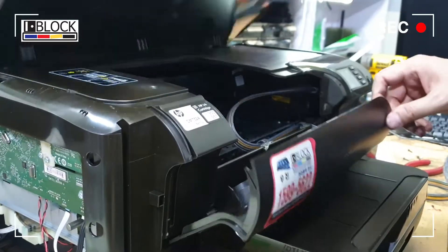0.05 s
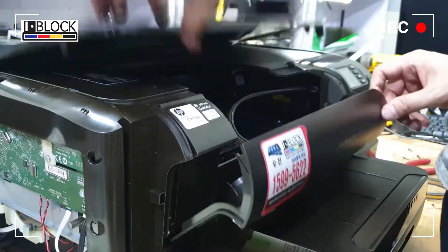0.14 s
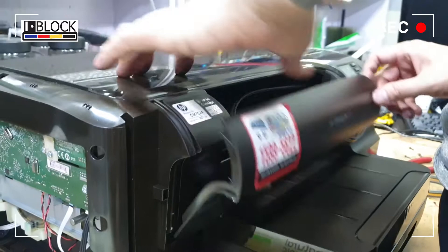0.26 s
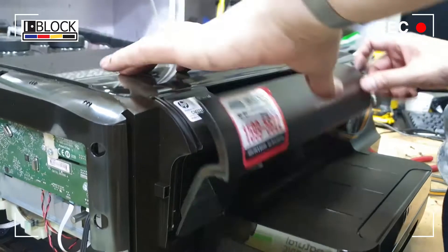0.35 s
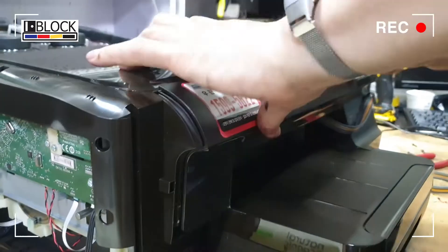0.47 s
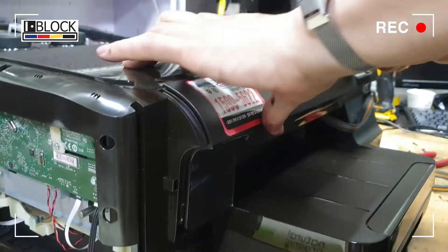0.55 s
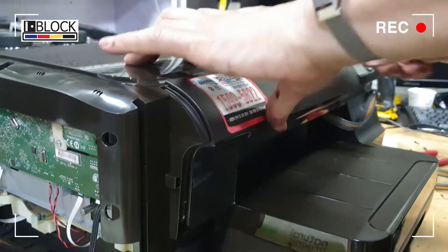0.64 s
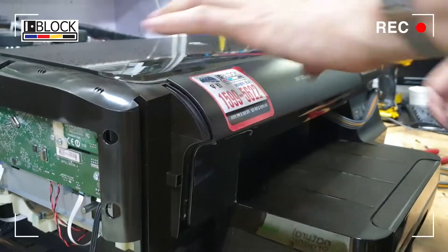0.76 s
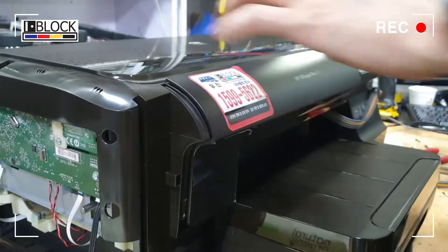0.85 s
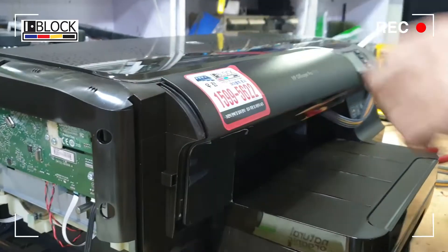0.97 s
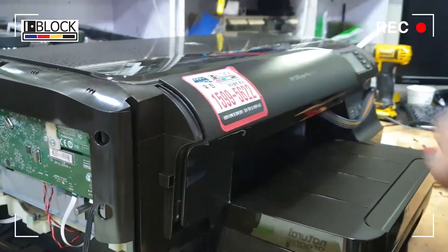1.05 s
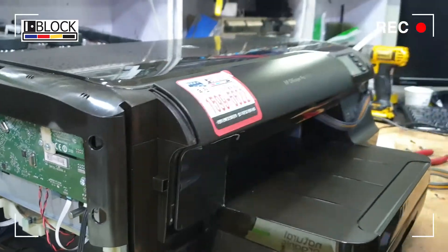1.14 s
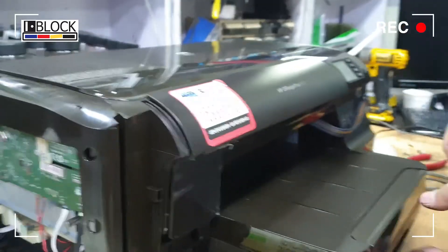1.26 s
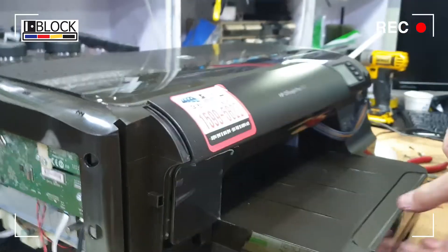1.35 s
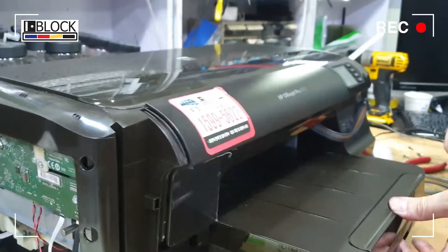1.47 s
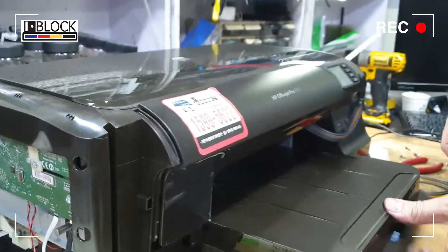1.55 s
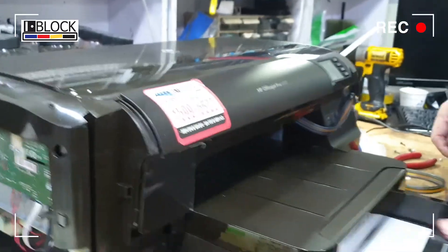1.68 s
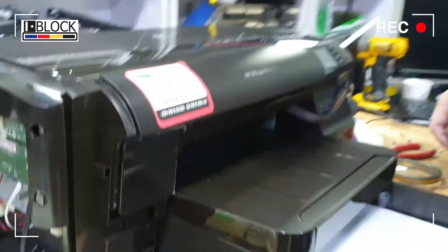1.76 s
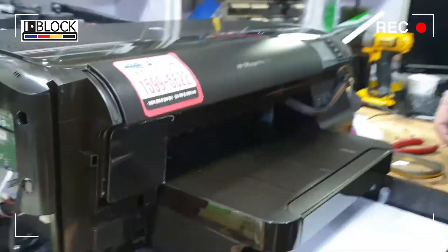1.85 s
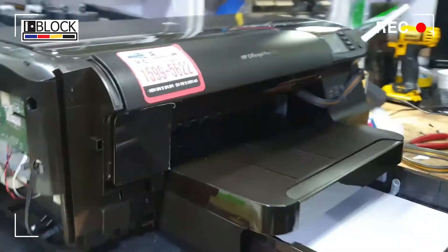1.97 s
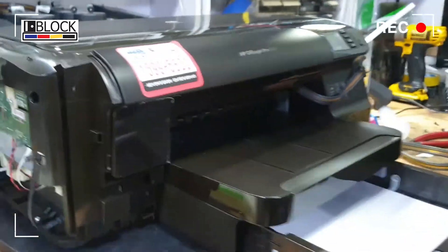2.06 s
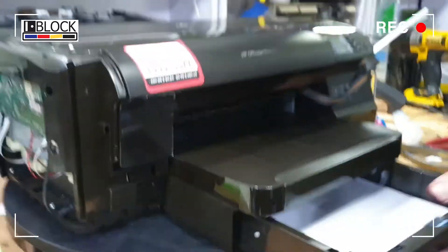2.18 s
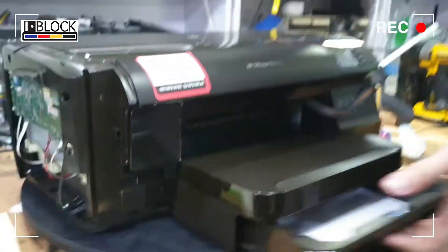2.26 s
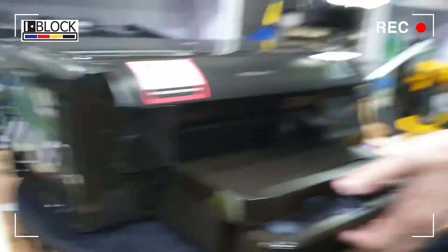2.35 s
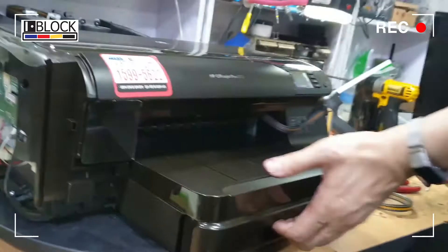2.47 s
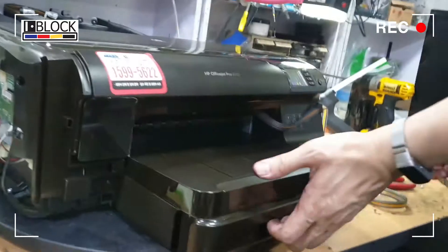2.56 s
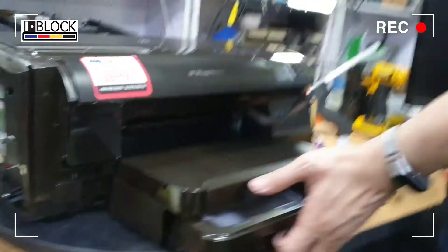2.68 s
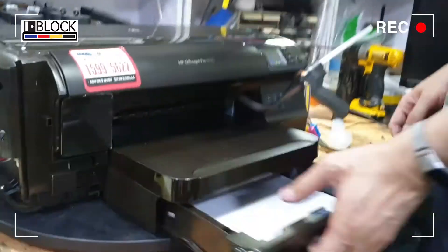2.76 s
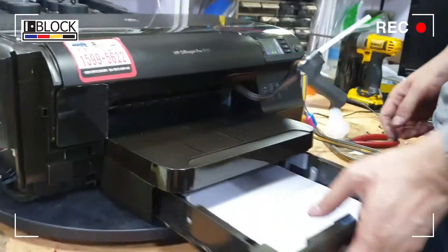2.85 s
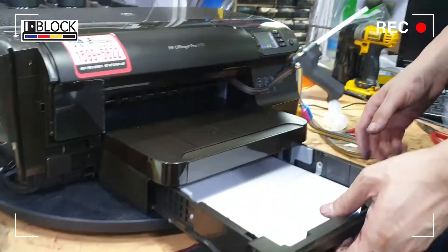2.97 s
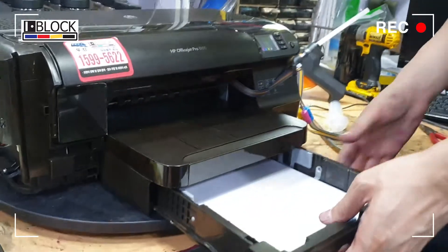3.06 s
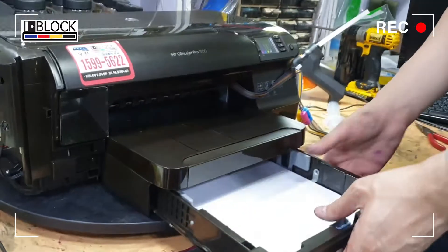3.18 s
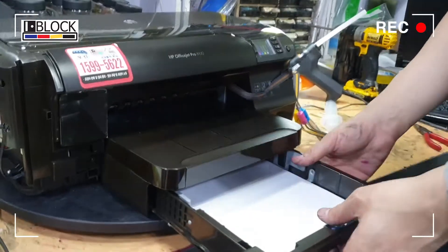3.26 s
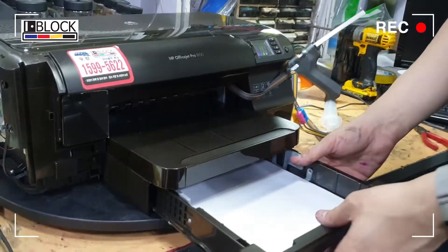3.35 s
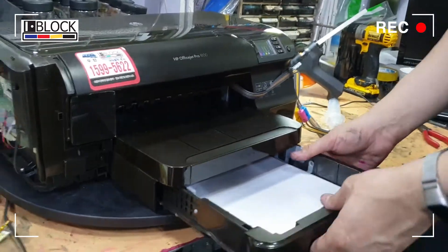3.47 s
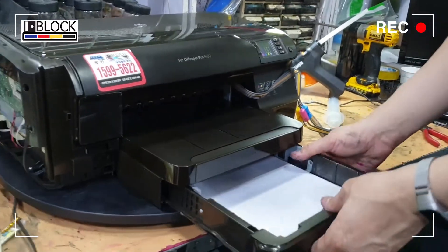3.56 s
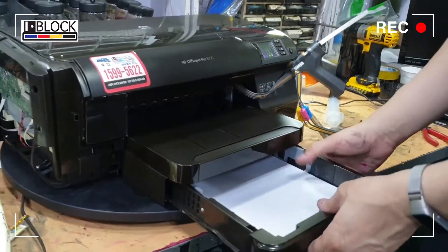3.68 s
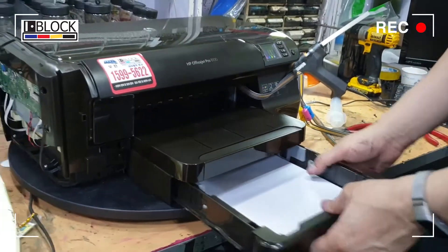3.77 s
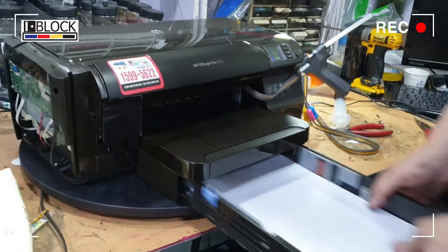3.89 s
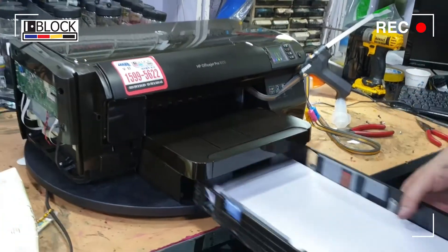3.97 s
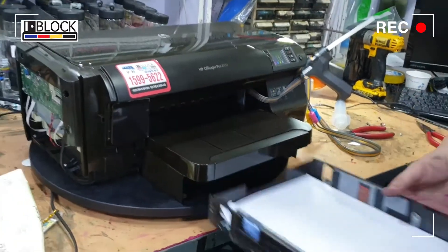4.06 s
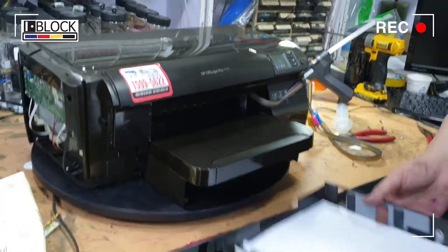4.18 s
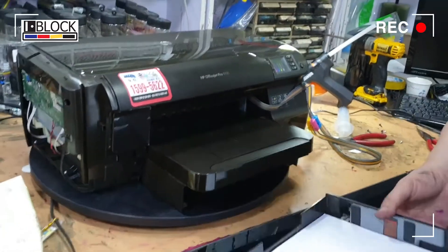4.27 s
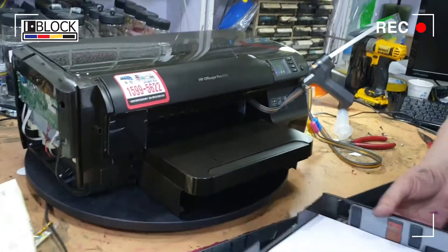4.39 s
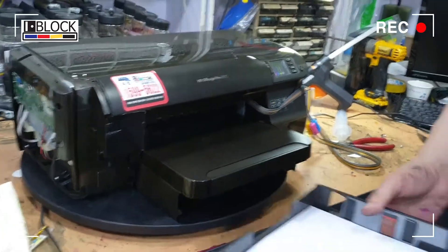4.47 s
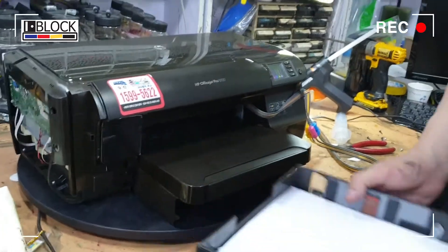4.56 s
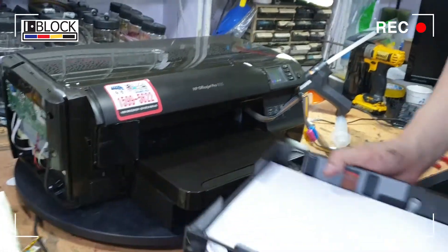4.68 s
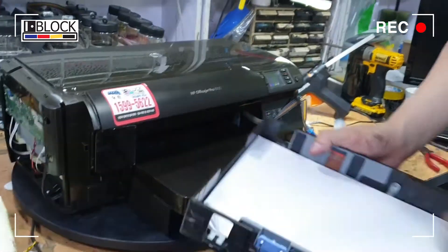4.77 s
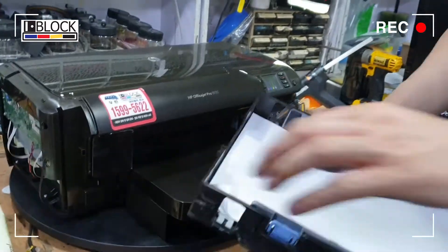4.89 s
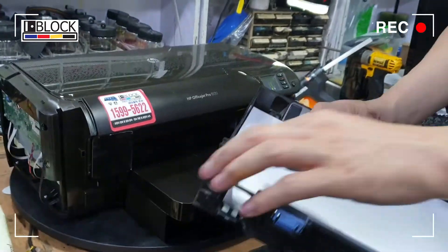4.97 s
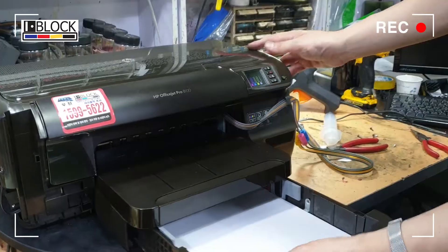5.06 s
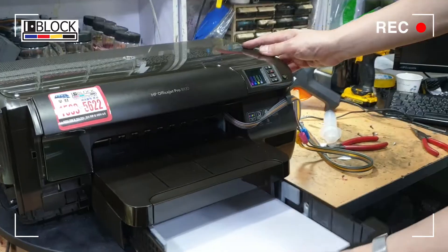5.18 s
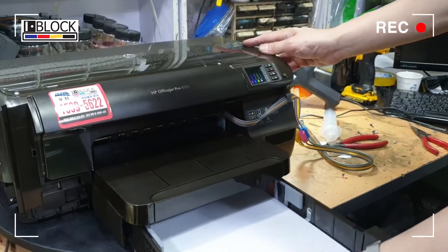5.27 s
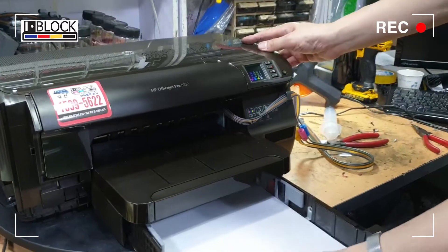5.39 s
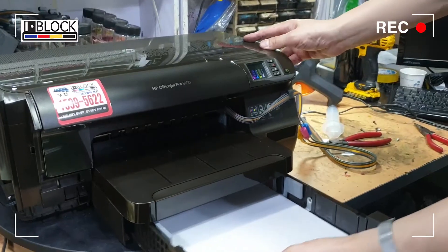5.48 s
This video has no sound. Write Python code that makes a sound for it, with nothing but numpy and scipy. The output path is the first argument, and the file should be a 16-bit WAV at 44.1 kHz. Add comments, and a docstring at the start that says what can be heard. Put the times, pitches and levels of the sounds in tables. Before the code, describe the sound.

Close handheld stereo recording of a plastic printer in a small workshop. A flap snaps in, the lid hinge chirps and the lid drops with a dull thump. Then the tray rattles, scrapes and squeaks along its rails, slams against its stop, clacks again sharply and ends in faint taps over low hum.

```python
"""Small workshop, two microphones on a hand-held camera: a low hum and air under a printer on a bench.
First a flap snaps in and the lid chirps and drops shut close by; then the paper tray is pulled, pushed home
and lifted out. Chattering contacts ring the hollow plastic shell; the tray scrapes and squeaks on its rails.
Noise impulses drive the shell's resonances, sine modes make the lid, and soft bumps reach the camera by touch."""
import sys
import numpy as np
from scipy import signal
from scipy.fft import rfft, irfft
from scipy.io import wavfile
from scipy.ndimage import uniform_filter1d

SR = 44100
rng = np.random.default_rng(int(sys.argv[2]) if len(sys.argv) > 2 else 0)


def master(y):
    """Save y as 16-bit WAV."""
    cut = np.clip(np.atleast_2d(y).T, -1, 1)
    pcm = np.round(cut * 32767)  # scale
    wavfile.write(sys.argv[1], SR, pcm.astype(np.int16))


N = 243873
TIME = np.arange(N) / SR   # s
GRID_HZ = np.maximum(np.fft.rfftfreq(4096, 1 / SR), 1)   # kept above zero for the log axis
CUTOFF_HZ = 16000


def from_db(db):
    """Decibels to gain."""
    return 10 ** (np.asarray(db) / 20)


def rms_one(x):
    """Scale to rms 1."""
    return x / np.sqrt(np.mean(x ** 2) + 1e-20)


def at_hz(points, hz):
    """Read a table on a log-frequency axis."""
    table = np.array(points)
    return np.interp(np.log(hz), np.log(table[:, 0]), table[:, 1])


def gain_curve(rows):
    """Smoothed gain in time from (t/s, level/dB) rows, -120 dB outside them."""
    s, db = np.transpose(rows)
    return uniform_filter1d(from_db(np.interp(TIME, s, db, left=-120, right=-120)), size=400)


def add(track, s, sound):
    """Mix a sound in at time s."""
    i = max(round(s * SR), 0)
    track[..., i:i + sound.shape[-1]] += sound[..., :N - i]


def coloured(x, db):
    """Causal, minimum-phase filter with the given dB on GRID_HZ."""
    cepstrum = irfft(np.log(from_db(db)))
    half = len(cepstrum) // 2
    # folding the cepstrum forward in time gives minimum phase
    cepstrum[1:half] *= 2
    cepstrum[half + 1:] = 0
    response = irfft(np.exp(rfft(cepstrum)))
    return signal.fftconvolve(x, response)[:len(x)]


def band(x, low_hz, high_hz, order=2):
    """Butterworth band-pass."""
    edges = [low_hz, min(high_hz, .49 * SR)]
    return signal.sosfilt(signal.butter(order, edges, "band", fs=SR, output="sos"), x)


def diffuse(count, apart_hz=850, bass_likeness=0.86):
    """White sound from all sides: alike at both microphones in the bass, unrelated in the treble."""
    mid, side = rfft(rng.standard_normal((2, count)))
    alike = min(bass_likeness, 1) / (1 + (np.fft.rfftfreq(count, 1 / SR) / apart_hz) ** 2)
    pair = np.sqrt(1 + alike) * mid + np.sqrt(1 - alike) * side * [[1], [-1]]
    return irfft(pair / np.sqrt(2), count)


# spectrum of the workshop air at the microphones: f/Hz, relative level/dB per Hz
AIR_SPECTRUM = [(20, -0.5), (35, -33), (58, -4), (100, -27.5), (200, -15), (400, -23), (1000, -25.5),
                (2500, -29), (3500, -35.5), (6000, -41.5), (10000, -41), (16000, -61)]
# swell of hum and handling rumble together, before their own offsets: t/s, level/dB
RUMBLE_LEVEL = [(0.0, -41.5), (0.18, -42.5), (0.77, -51), (2.09, -46.5), (4.96, -62), (5.16, -53),
                (5.53, -58)]
AIR_DB, HUM_HZ, HUM_DB = -50, 56.6, 1   # the hum's amplitude is re RUMBLE_LEVEL


def background(waver=0.083, handling_db=-2.5, left_db=-15.0):
    """Steady room air, a low wavering hum, and low-band noise from the hand that holds the camera."""
    air = rms_one(np.array([coloured(side, at_hz(AIR_SPECTRUM, GRID_HZ)) for side in diffuse(N)]))
    swell = 1 + waver * np.interp(TIME, np.linspace(0, TIME[-1], 30), rng.standard_normal(30))
    hum = from_db(HUM_DB) * swell * np.sin(2 * np.pi * HUM_HZ * TIME)
    rumble = rms_one(band(rng.standard_normal(N), 60, 144))
    handling = from_db(handling_db) * rumble * from_db([[left_db], [0]])   # weaker at the left microphone
    return from_db(AIR_DB) * air + gain_curve(RUMBLE_LEVEL) * (hum + handling)


# decay of the small workshop: f/Hz, t60/s
WORKSHOP_DECAY = [(100, 0.25), (300, 0.31), (1000, 0.2), (3000, 0.35), (7000, 0.36), (15000, 0.32)]


def workshop(x, tail_db=-6.0, tail_rise_s=0.0024):
    """The cluttered room stores each band's energy and gives it back as a smooth, diffuse tail."""
    out, washes = x.copy(), [diffuse(N), diffuse(N)]
    edges = np.geomspace(80, 18000, 17)
    build = np.exp(-1 / (tail_rise_s * SR))
    for k, (low, high) in enumerate(zip(edges, edges[1:])):
        t60 = at_hz(WORKSHOP_DECAY, np.sqrt(low * high))
        keep = from_db(-60 / (t60 * SR)) ** 2   # energy left after one sample
        power = band(x[k % 2], low, high) ** 2   # left and right feed alternate bands
        gain, feedback = [(1 - keep) * (1 - build)], np.convolve([1, -keep], [1, -build])
        stored = signal.lfilter(gain, feedback, power + 1e-18)
        wash = rms_one(band(washes[k % 2], low, high))
        out += from_db(tail_db) * np.sqrt(np.abs(stored)) * wash
    return out


# the hand bumps the camera body: centre t/s, peak level/dB before the microphone gains, f/Hz, length/s
CAMERA_BUMPS = [(0.05, -19.5, 109, 0.015), (0.071, -16.5, 73, 0.056), (1.022, -33.5, 60, 0.039),
                (1.948, -33, 76.4, 0.19), (2.004, -19.5, 89, 0.023), (2.197, -22, 86, 0.024),
                (2.218, -18, 61.3, 0.088)]


def bumps(left_db=-42.0, right_db=0.5):
    """The camera body rocks briefly at a low pitch, mostly at the right microphone."""
    out = np.zeros(N)
    for s, db, hz, length in CAMERA_BUMPS:
        t = TIME[:int(length * SR)] - length / 2
        rocking = np.hanning(len(t)) * np.cos(2 * np.pi * hz * t)
        add(out, s - length / 2, -from_db(db) * rocking)
    return out * from_db([[left_db], [right_db]])


def nearby(x, near_db=1.5, near_t60=0.03):
    """Direct sound plus quick reflections off bench and case, drawn anew each call; keeps the rms."""
    t = TIME[:SR // 16]
    reflections = rms_one(diffuse(len(t)) * from_db(-60 * t / near_t60))
    response = from_db(near_db) * reflections / np.sqrt(len(t))
    # the direct path has its own delay of 0-7 samples to each microphone
    response[[0, 1], rng.integers(0, 8, 2)] += 1
    heard = signal.fftconvolve(x[None], response, axes=1)[:, :len(x)]
    return np.std(x) * rms_one(heard)


# short squeaks and chirps of the lid's hinge and the tray's rails:
# t/s, length/s, f/Hz, level of the fundamental/dB, fall per overtone/dB
SQUEAKS = [(0.428, 0.0085, 2010, -20, 18), (2.79, 0.022, 10830, -36, 24), (2.934, .1, 10330, -30.5, 23),
           (3.142, 0.022, 1740, -30, 5), (3.4486, 0.015, 2168, -25.5, 5.5), (3.425, 0.11, 2204, -41, 19)]


def squeaks(waver=0.017):
    """Short stick-slip tones with overtones and an unsteady pitch (waver is a share of it, rms)."""
    out = np.zeros(N)
    for s, length, hz, db, fall_db in SQUEAKS:
        n = int(length * SR)
        pitch = hz * (1 + waver * rms_one(uniform_filter1d(rng.standard_normal(n), size=60)))
        phase = 2 * np.pi * np.cumsum(pitch) / SR
        tone = sum(from_db(db - fall_db * k) * np.sin((k + 1) * phase)
                   for k in range(5) if (k + 1) * hz < CUTOFF_HZ)
        add(out, s, tone * np.hanning(n))
    return out


def peak_db(hz, width_hz, lift_db):
    """One resonant hump, in dB."""
    return lift_db / (1 + (2 * (GRID_HZ - hz) / width_hz) ** 2)


# resonances of the hollow plastic shell: f/Hz, width/Hz, lift/dB
SHELL_RESONANCES = [(260, 92, 8), (462, 72, 9), (761, 104, 5), (1064, 22, 8), (1440, 340, 3.5),
                    (2000, 230, 4.5), (2820, 450, 2), (3440, 120, -2.5), (4390, 530, 3)]


def shell_db(spectrum):
    """A broad colour with the shell's resonances on top."""
    return at_hz(spectrum, GRID_HZ) + sum(peak_db(*mode) for mode in SHELL_RESONANCES)


def micro_contacts(count, per_s, spread_db):
    """Random tiny impacts of uneven size and either sign; rms 1."""
    sizes = from_db(spread_db * np.clip(rng.standard_normal(count), -2, 2))
    impacts = sizes * rng.choice([-1, 1], count)
    return rms_one(impacts * (rng.random(count) < per_s / SR))


def scrape(spectrum, per_s, spread_db, judder_db):
    """Tiny slips into the shell, swelling and sticking unevenly; rms 1."""
    judder = rms_one(band(rng.standard_normal(N), 10, 60))
    slips = micro_contacts(N, per_s, spread_db) * from_db(judder_db * judder)
    return rms_one(coloured(slips, shell_db(spectrum)))


def swells(rows, attack_s, release_s):
    """Gain of rubbing gestures: each rises up to its start, holds and dies away exponentially."""
    gain = 0
    for s, length, db in rows:
        before, after = np.maximum(s - TIME, 0), np.maximum(TIME - s - length, 0)
        gain = gain + from_db(db) * np.exp(-before / attack_s - after / release_s)
    return gain


def sliding(x, step_s=.03):
    """A sliding contact keeps moving, so its near reflections change in overlapping pieces."""
    out, step = np.zeros((2, N)), int(step_s * SR)
    for i in range(0, N, step):
        piece = x[i:i + 2 * step]
        piece = piece * np.sin(np.linspace(0, np.pi, len(piece)))
        add(out, i / SR, nearby(np.pad(piece, (0, step))))
    return out


# hands and tray rub over plastic: start t/s, length/s, level/dB before the layer trim
RUB_STROKES = [(0.2, 0.068, -34), (0.55, .3, -49.5), (1.36, 0.3, -43), (1.54, 0.23, -32.5),
               (2.22, 0.22, -40), (2.5, 0.57, -36.5), (3.05, 0.24, -43), (3.42, 0.095, -41.5),
               (3.61, 0.058, -40.5), (3.82, 0.11, -29), (4.02, 0.13, -51), (4.54, 0.1, -48),
               (5.22, 0.36, -42)]
# colour of rubbing, before the shell: f/Hz, relative level/dB per Hz
RUB_COLOUR = [(100, 5), (400, -5.5), (1000, -3.5), (2200, -4.5), (3200, -12.5), (5000, -12.5),
              (8000, -19.5), (10500, -17), (16000, -29)]
# the tray's fast run on its rails, steady until it stops: start t/s, length/s, level/dB before the trim
FAST_RUN = [(2.935, 0.086, -25.5)]
# colour of the fast run, before the shell: f/Hz, relative level/dB per Hz
RASP_COLOUR = [(100, -11), (400, -9), (800, -7), (1500, -6.5), (2400, 0), (3300, -9.5), (4600, -6.5),
               (7500, -14), (10400, -18), (16000, -55)]
# fingers and paper brush smooth plastic: start t/s, length/s, level/dB before the layer trim
BRUSH_TOUCHES = [(0.0, .17, -51), (.19, 0.13, -57), (0.437, .028, -38), (1.01, 0.07, -56.5),
                 (2.19, 0.092, -47.5), (2.26, 0.26, -46), (2.69, 0.23, -42), (4.1, 0.14, -46.5),
                 (4.3, 0.2, -58.5), (4.54, 0.047, -45)]
# colour of brushing, before the shell: f/Hz, relative level/dB per Hz
BRUSH_COLOUR = [(1000, -54), (2500, 2), (3600, -2), (6500, -2), (8500, -8), (11000, -4), (16000, -17.5)]
# time constants of rise and fall
STROKE_ATTACK_S, STROKE_RELEASE_S = 0.03, 0.05
RUN_ATTACK_S, RUN_RELEASE_S = 0.043, 0.011
BRUSH_ATTACK_S, BRUSH_RELEASE_S = .015, 0.045


def rails(stroke_db=-7.0, run_db=0.0, brush_db=-4.5):
    """Slow strokes are sparse, grainy slips, the fast run a dense rasp, light touches a hiss."""
    slow = scrape(RUB_COLOUR, per_s=1500, spread_db=4.5, judder_db=2.5)
    slow *= from_db(stroke_db) * swells(RUB_STROKES, STROKE_ATTACK_S, STROKE_RELEASE_S)
    fast = scrape(RASP_COLOUR, per_s=6100, spread_db=3.0, judder_db=-1.7)
    fast *= from_db(run_db) * swells(FAST_RUN, RUN_ATTACK_S, RUN_RELEASE_S)
    light = scrape(BRUSH_COLOUR, per_s=8900, spread_db=11.0, judder_db=0.0)
    light *= from_db(brush_db) * swells(BRUSH_TOUCHES, BRUSH_ATTACK_S, BRUSH_RELEASE_S)
    return sliding(slow + fast + light)


# the lid lands on the case, close by: t/s, level/dB
LID_LANDINGS = [(0.4724, -17)]
# low modes of the broad lid: f/Hz, level re the landing/dB, t60/s
LID_MODES = [(244, -14, 0.065), (310, 9.5, 0.04), (345, -17, 0.2), (463, -9, 0.06), (744, -9, 0.085),
             (980, -10, 0.07), (1390, -15, 0.12)]


def lid():
    """The broad lid thumps in its low modes, all struck at once."""
    t, out = TIME[:SR // 2], np.zeros(N)
    thump = sum(from_db(db - 60 * t / t60) * np.sin(2 * np.pi * hz * t) for hz, db, t60 in LID_MODES)
    for s, db in LID_LANDINGS:
        add(out, s, from_db(db) * thump)
    return out


# parts knock and chatter: t/s, part, middle level/dB, treble re middle/dB (hardness), middle t60/s;
# levels are before the band trims
PART_KNOCKS = [(0.207, "flap", -27.5, 1.5, .15), (0.221, "flap", -18.5, 1.5, 0.075),
               (0.2322, "flap", -23, -1.5, 0.076), (0.4298, "catch", -31, -0.5, 0.032),
               (0.461, "lid", -33.5, 5, .07), (0.4706, "lid", -15.5, -7, 0.031),
               (1.49, "tray", -36.5, -16, .14), (1.511, "tray", -35.5, -13, 0.38),
               (1.567, "tray", -18, -7.5, 0.15), (1.584, "tray", -16, -6.5, 0.18),
               (1.614, "tray", -18, -5, 0.1284), (1.7692, "rail", -25, -5, 0.089),
               (1.8446, "rail", -36, -12, 0.045), (2.088, "rail", -32.5, -12, .1),
               (2.2359, "rail", -27, -8.5, 0.084), (2.249, "catch", -30, -6, 0.1),
               (2.341, "rail", -38, -11, 0.28), (2.4886, "stop", -30, -6, 0.2),
               (2.513, "rail", -32, -9, 0.23), (2.62, "tray", -36.5, -14, 0.18),
               (2.678, "tray", -32.5, -7, 0.24), (2.781, "stop", -37, -17, 0.045),
               (2.829, "stop", -19, -9.5, 0.08), (2.8812, "catch", -17.5, -3, 0.047),
               (2.901, "stop", -13, -3, 0.14), (3.1704, "stop", -34, -9.5, 0.018),
               (3.485, "rail", -35, -27, 0.1), (3.6001, "rail", -40.5, -4.5, 0.14),
               (3.8, "catch", -34, -5.5, 0.17), (3.837, "stop", -15.5, .5, 0.13),
               (3.857, "catch", -15.5, -1, 0.2), (3.876, "stop", -16, -4, .1),
               (4.636, "catch", -42, 0.5, .11), (5.0568, "case", -34.5, -7.5, 0.081),
               (5.279, "case", -38.5, -11, 0.11), (5.3645, "catch", -34.5, -3.5, 0.044),
               (5.4046, "stop", -42.5, -18, 0.014), (5.454, "stop", -43, -17, 0.094),
               (5.487, "case", -35, -4.5, 0.2)]
# the struck parts: own ring f/Hz, bass re middle/dB before the band trims
STRUCK_PARTS = {"flap": (1010, -1.1), "lid": (1440, -4.5), "tray": (1016, -10), "rail": (1730, -5),
                "catch": (2670, -13.5), "stop": (1420, -10.5), "case": (1090, -2.3)}
# light ticks of latches and loose guides: t/s, level/dB before the offsets below
LATCH_TICKS = [(0.3572, -28.5), (1.509, -36.5), (1.909, -42.5), (1.9718, -40), (2.6758, -28), (3.3504, -47),
               (4.0815, -37), (4.1081, -40), (4.2284, -34), (4.3122, -38), (4.4563, -44.5), (5.1755, -33)]
# all ticks are short, thin and bright; bass and treble are re middle
TICK_HZ, TICK_T60_S, TICK_MIDDLE_DB, TICK_BASS_DB, TICK_TREBLE_DB = 3720, 0.017, -9, -9.5, 3


def contacts():
    """Knocks and ticks alike as (t/s, middle/dB, treble/dB, t60/s, ring f/Hz, bass/dB)."""
    heavy = [(s, db, treble, t60, *STRUCK_PARTS[part]) for s, part, db, treble, t60 in PART_KNOCKS]
    light = [(s, db + TICK_MIDDLE_DB, TICK_TREBLE_DB, TICK_T60_S, TICK_HZ, TICK_BASS_DB)
             for s, db in LATCH_TICKS]
    return heavy + light


# colour of struck plastic, before the resonances: f/Hz, relative level/dB per Hz
STRUCK_COLOUR = [(60, -2.5), (130, -9.5), (280, -13), (500, -9), (1000, -3), (1700, -2.5), (2600, -4),
                 (4000, -10), (7000, -13), (10000, -15.5), (15500, -20)]
SCUFF_S, SCUFF_DB = .010, -21.5   # parts scuff each other just before they meet
RISE_SHARE = .018   # a chatter's build-up time constant as a share of its t60


def knocks(bass_db=-0.5, middle_db=-1.0, treble_db=-1.5, bass_ring=1.13, treble_ring=0.8,
           part_db=6.0, part_width=0.17):
    """A scuff, then a dying chatter of tiny impacts drives shell and struck part; the bass lasts longest."""
    t, out, shell = TIME[:SR // 4], np.zeros((2, N)), shell_db(STRUCK_COLOUR)
    zones = [(70, 600, bass_ring), (600, 3500, 1), (3500, 18000, treble_ring)]   # low/Hz, high/Hz, t60 factor
    since = np.maximum(t - SCUFF_S, 0)   # time since the parts met
    scuff = from_db(SCUFF_DB) * np.minimum(t / SCUFF_S, 1)
    for s, db, treble, t60, hz, bass in contacts():
        rise = RISE_SHARE * t60
        onset = scuff + 1 - np.exp(-since / max(rise, 1e-4))
        force = micro_contacts(len(t), per_s=5000, spread_db=9.0) * onset
        colour = shell + peak_db(hz, part_width * hz, part_db)
        levels = [bass + bass_db, middle_db, treble + treble_db]
        for (low, high, ring), level in zip(zones, levels):
            dying = force * from_db(-60 * since / (max(t60, .01) * ring))
            sound = band(coloured(dying, colour), low, high, order=3)
            early = np.std(sound[since > 0][:SR // 50])   # the first 20 ms of contact set the level
            add(out, s - SCUFF_S - rise / 2, from_db(db + level) * nearby(sound / early))
    return out


def scene(lid_room_db=-5.0):
    """The printer in the room, plus what reaches the camera by touch; the lid is close, so it is drier."""
    thump, share = lid(), min(from_db(lid_room_db), 1)
    printer = workshop(knocks() + share * thump + rails() + nearby(squeaks()))
    return printer + (1 - share) * thump + bumps() + background()


TOP = 1.8   # ceiling of the soft peak rounding


def record(dry):
    """The deepest rumble is thinned, the highest peaks are rounded and the top is cut."""
    thinned = signal.sosfilt(signal.butter(2, 32, "high", fs=SR, output="sos"), dry)
    rounded = TOP * np.tanh(thinned / TOP)
    return signal.sosfilt(signal.ellip(10, .1, 80, CUTOFF_HZ, fs=SR, output="sos"), rounded)


dry = scene()
out = record(dry)
master(out)
```